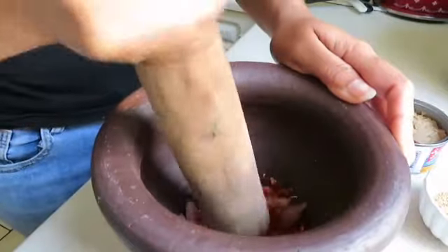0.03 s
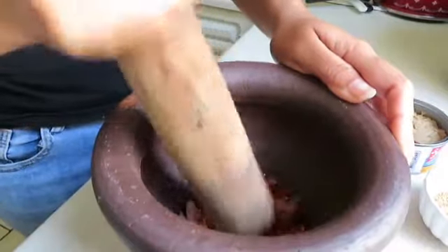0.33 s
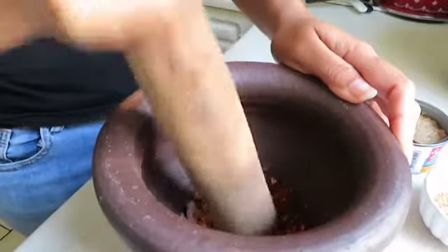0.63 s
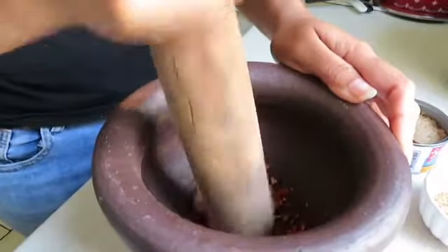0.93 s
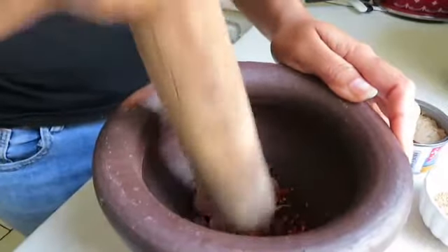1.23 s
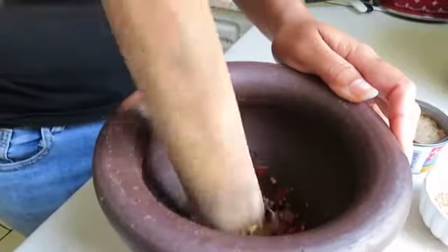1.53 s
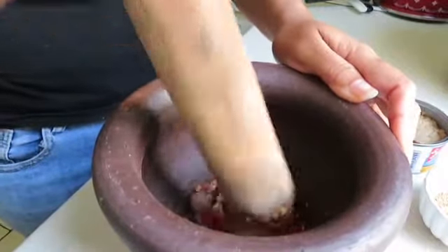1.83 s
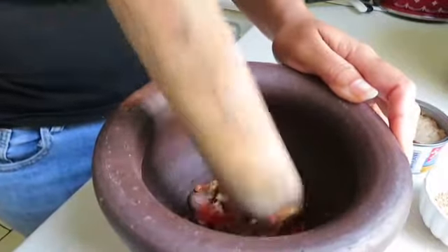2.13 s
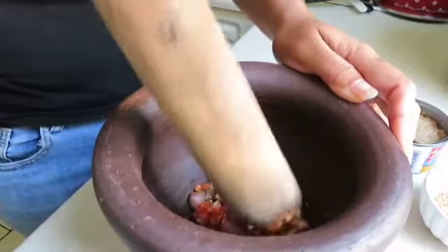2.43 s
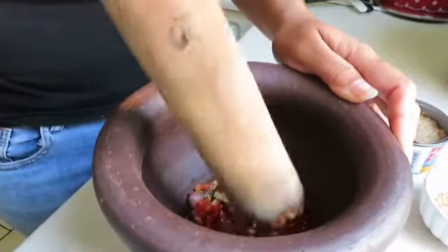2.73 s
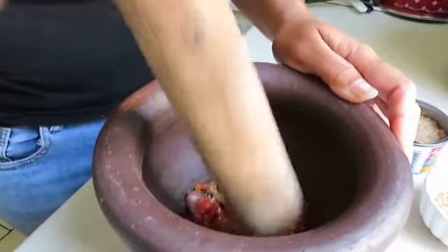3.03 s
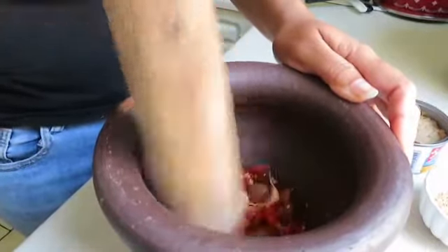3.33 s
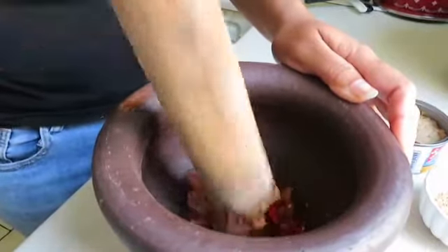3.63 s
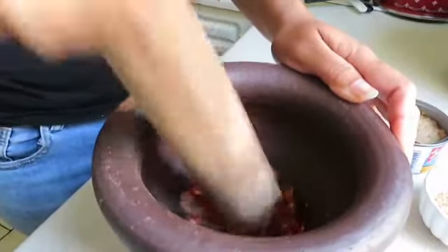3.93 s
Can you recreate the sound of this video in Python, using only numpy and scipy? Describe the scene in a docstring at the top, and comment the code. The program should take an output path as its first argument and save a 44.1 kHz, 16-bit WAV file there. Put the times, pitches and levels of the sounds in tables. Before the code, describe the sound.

Close, regular pounding of a wooden pestle in a clay mortar crushes wet spices in a quiet kitchen. Some strokes knock on the bowl, others thud and squelch, growing heavier with a brief scrape in the second half.

```python
"""A wooden pestle pounds moist spices in a clay mortar on a kitchen table, about 3.5 strokes a second.
Each impact crushes the paste and excites the table's low modes; those that reach the clay knock and
set the bowl in free vibration. Bubbles burst, bits crackle as the pestle shifts, and once it grinds
along the wall. A small room reverberates, and the hardest knocks overload the microphone."""
import sys
import numpy as np
from scipy import signal
from scipy.fft import rfft, irfft, next_fast_len
from scipy.io import wavfile

SR = 44100
rng = np.random.default_rng(int(sys.argv[2]) if len(sys.argv) > 2 else 0)


def output_pcm(signal):
    """Save a mono or channel-first signal as 16-bit PCM at the path in sys.argv[1].

    Samples are clipped to [-1, 1] before scaling.
    """
    pcm = np.clip(np.atleast_2d(signal).T, -1, 1) * 32767
    wavfile.write(sys.argv[1], SR, np.round(pcm).astype(np.int16))


N = 176400
TIME = np.arange(N) / SR
AGE = np.arange(SR // 2) / SR  # time since a sound began [s]
CRUNCH_LEAD_S, CRUNCH_FALL_S = .1, .0051

# pestle meets paste: (time [s], crunch [dB], swell [s], wet fizz [dB], table thump [dB])
STROKES = [(0.037, -33.5, .002, -50, -44), (0.341, -27, 0.0041, -42, -11.5), (.615, -43, 0.0075, -47, -35),
           (0.899, -79, 0.0031, -63, -10), (1.218, -19, 0.0061, -32.5, -4.5),
           (1.468, -17.5, 0.0019, -34.5, -7.5), (1.745, -33, 0.005, -53, -32.5),
           (2.063, -25.5, 0.0085, -41.5, -18), (2.363, -22, 0.0047, -38.5, -13),
           (2.646, -15.5, 0.0034, -29.5, -1), (2.9245, -9.5, 0.0023, -26.5, -2),
           (3.2095, -14.5, 0.0027, -29.5, -6), (3.480, -14, 0.0021, -49.5, -22),
           (3.818, -27, 0.0051, -49.5, -19.5)]
def pounding():
    """Inelastic impact: each stroke crushes the paste, squeezes it aside and shakes the table."""
    out = np.zeros((2, N))
    for s, db, swell_s, fizz_db, thump_db in STROKES:
        add(out, s - CRUNCH_LEAD_S, crunch(db, swell_s, fizz_db))
        add(out, s, squeeze(db - 23.5))
        add(out, s + .00067, thump(thump_db))
    return out


def crunch(db, swell_s, fizz_db):
    """Stress and release: pressure on the paste grows exponentially, then lets go quickly."""
    t = AGE - CRUNCH_LEAD_S
    pressure = np.exp(np.minimum(t, 0) / swell_s - np.maximum(t, 0) / CRUNCH_FALL_S)
    return in_room(pressure * paste(db, fizz_db), wet_db=-11.5)


# spectra of the bowl's cavity and of the wet fizz: (frequency [Hz], relative density [dB])
CAVITY = [(100, -14.5), (400, -3.5), (720, -3.5), (1050, -15), (1500, -2), (1850, -1), (2300, -1),
          (3200, -1.5), (4000, -14.5), (5500, -21), (14000, -31.5)]
FIZZ = [(1000, -33.5), (3500, -12.5), (6000, 2.5), (9500, 3), (12000, 1.5), (15000, -21), (16500, -26.5)]
def paste(db, fizz_db):
    """Source and filter: the cavity colours the ticks of bursting fibres, with wet fizz on top."""
    fibres = amp(db) * coloured(grains(len(AGE)), CAVITY)
    fizz = amp(fizz_db) * coloured(grains(len(AGE)), FIZZ)
    return fibres + fizz


def squeeze(db, fade_s=.06, clumps_per_s=170, spread_db=4):
    """Amplitude modulation: the paste oozes from under the pestle in uneven clumps."""
    sizes = rng.standard_normal(clumps_per_s)
    clumps = amp(spread_db * np.interp(AGE * clumps_per_s, np.arange(clumps_per_s), sizes))
    return in_room(clumps * np.exp(-AGE / fade_s) * paste(db, fizz_db=db - 16), wet_db=-12)


# modes of the table: (frequency [Hz], relative level [dB], T60 [s])
TABLE_MODES = [(62.6, -17.5, 0.28), (69, 4.5, 0.056), (118, -8, 0.099), (184.7, -12, 0.091),
               (251, -19.5, 0.041)]
def thump(db, attack_s=.0068):
    """Structure-borne sound: the blow passes into the table and excites its low modes."""
    modes = -ring(TABLE_MODES, cut_hz=300, scatter_db=3.85, detune=.012)
    attack = 1 - np.exp(-AGE / attack_s)
    return in_room(amp(db) * modes * attack, wet_db=-9.5)


# pestle reaches clay: (time [s], body [dB], contact cut-off [Hz], clack [dB], clack pitch [Hz],
# wall ring [dB], ring tilt [dB/octave], hollow [dB], hollow pitch [Hz])
KNOCKS = [(.0390, -14.5, 1400, 5, 1457, -26.5, -0.9, -36.5, 313),
          (0.6151, -17, 1030, -3.5, 1540, -24, -3.5, -36, 586),
          (0.8963, -20, 378, -30, 1243, -48, 1.5, -20, 317),
          (1.4667, -16.5, 924, 0, 1470, -32.5, -2.5, -32, 340),
          (1.7447, -16, 1764, 11.5, 1662, -22, -3, -17.5, 437),
          (2.9225, -24.5, 556, -10, 2210, -46, 5, -25, 322),
          (3.2071, -26, 700, 2.5, 2290, -52, -12, -29, 346),
          (3.4796, -15.5, 2293, 14.5, 1830, -19, -7.5, -10, 344),
          (3.83, -33, 490, -61, 1370, -74, -3, -63, 755),
          (3.86, -41.5, 490, -42.5, 1440, -80.5, -11, -32.5, 648)]
def knocks():
    """Impulse response: wood on clay excites the body, the hollow, the pestle's clack and the wall."""
    out = np.zeros((2, N))
    for s, body_db, contact_hz, clack_db, clack_hz, wall_db, tilt_db, hollow_db, hollow_hz in KNOCKS:
        body = amp(body_db) * mortar_body(contact_hz)
        hollow = damped_sine(hollow_hz, hollow_db, t60=.09)
        clack = damped_sine(clack_hz, clack_db, t60=.011)
        wall = amp(wall_db) * wall_ring(tilt_db)
        knock = in_room(body, wet_db=-6) + hollow + in_room(clack, wet_db=-15)
        add(out, s, knock + in_room(wall, wet_db=1.5))
    return out


# modes of mortar and pestle on the table: (frequency [Hz], relative level [dB], T60 [s])
BODY_MODES = [(129.1, -15, 0.47), (177, -13.5, 0.22), (236, -12.5, 0.17), (344.5, -1.5, 0.12),
              (436.3, -3.5, 0.099), (586.5, -7, 0.16), (680, 3, .04), (756, 5.5, 0.033), (957, -4.5, 0.073),
              (1167, -2, .07)]
# spectrum of the contact's crack: (frequency [Hz], relative density [dB])
CRACK = [(60, -5), (150, 29), (400, 15.5), (800, 11.5), (950, 8), (1500, -26), (2000, -2), (2600, 2.5),
         (4500, -36), (12000, -108), (16000, -50)]
def mortar_body(contact_hz):
    """Contact as a low-pass filter: a softer blow dulls both the crack and the body's modes."""
    noise = coloured(rng.standard_normal(len(AGE)), CRACK)
    crack = filtered(noise, lambda hz: lowpass(hz, 3 * contact_hz)) * decay(db=5, t60=.036)
    return ring(BODY_MODES, contact_hz, scatter_db=1, detune=.027) + crack


# modes of the clay wall: (frequency [Hz], relative level [dB], T60 [s])
WALL_MODES = [(1458, -2, 0.13), (1525, -4, .3), (1595, -9, .32), (1770, -8, 0.17), (1833, -2.5, 0.15),
              (2250, -19.5, 0.083), (3280, -18.5, 0.29), (3630, -9, 0.14), (3870, -10, .2),
              (5430, -11, 0.22), (5710, -12.5, 0.16), (7540, -10.5, 0.092), (8450, -15.5, 0.067),
              (9420, -13, 0.2), (10570, -18, 0.21), (12200, -9.5, 0.23), (12600, -16, .14),
              (14400, -18, .15)]
# spectrum of its crowded high modes: (frequency [Hz], relative density [dB])
SPARKLE = [(2000, -28.5), (3500, 2), (4700, -6), (6000, -5.5), (9000, -2.5), (12500, -3), (13500, -15.5),
           (16000, -30.5)]
def wall_ring(tilt_db, partials=8, split_hz=48):
    """Mode splitting: uneven clay gives beating partials; a glancing contact favours the high ones."""
    hz, db, t60 = np.transpose(WALL_MODES)[:, :, None]
    tilted_db = db + tilt_db * np.log2(hz / hz[0])
    beating = np.zeros(len(AGE))
    for _ in range(partials):
        shift, phase = rng.uniform(-1, 1, (2, len(WALL_MODES), 1))
        beating += damped_sine(hz + split_hz * shift, tilted_db, t60, np.pi * phase).sum(axis=0)
    sparkle = coloured(rng.standard_normal(len(AGE)), SPARKLE)
    sparkle = filtered(sparkle, lambda f: amp(tilt_db * np.log2(np.maximum(f / hz[0], 1))))
    return beating / np.sqrt(partials) + sparkle * decay(db=-11, t60=.17)


# loose bits of paste: (time [s], crunch [dB], swell [s], wet fizz [dB])
CRACKLES = [(0.4083, -43, 0.00034, -67), (.428, -45.5, .008, -72), (.632, -22.5, 0.0022, -32),
            (.945, -29, 0.013, -39.5), (.989, -41, 0.0018, -67), (1.036, -45.5, 0.0025, -56),
            (1.299, -41.5, 0.002, -56.5), (1.490, -29, 0.013, -38), (2.16, -42, .002, -60),
            (2.4579, -33.5, 0.0007, -49.5), (2.737, -38, .008, -59.5), (3.201, -29.5, .001, -40),
            (3.799, -37, 0.0023, -41)]
def crackling():
    """Acoustic emission: bits of paste snap or pull free as the pestle shifts."""
    out = np.zeros((2, N))
    for s, db, swell_s, fizz_db in CRACKLES:
        add(out, s - CRUNCH_LEAD_S, crunch(db, swell_s, fizz_db))
    return out


def bubbles(per_stroke=43, settle_s=.048, centre_hz=4800, decay_cycles=2.5):
    """Bubble resonance: as the paste settles, tiny bubbles burst, each at its own pitch."""
    pops, t = np.zeros(N), AGE[:SR // 200]
    for s, *_ in STROKES:
        for wait, octaves, size in rng.standard_normal((per_stroke, 3)):
            hz = np.clip(centre_hz * 2 ** octaves, 1200, 13000)
            db = -47 + 4 * np.clip(size, -2, 2) - 6 * abs(wait)  # later pops are fainter
            pop = amp(db) * np.exp(-t * hz / decay_cycles) * np.sin(2 * np.pi * hz * t)
            add(pops, s + abs(wait) * settle_s, pop)
    return in_room(pops, wet_db=-5)


# spectrum of dragged grit: (frequency [Hz], relative density [dB])
GRIT = [(100, 11), (550, -1.5), (900, -11.5), (1600, -11), (2050, 6), (2500, -9), (3500, -14), (4900, -30),
        (5450, -14), (6300, -28.5), (14000, -38.5)]
# envelope of the drag: (time [s], level [dB])
DRAG = [(2.65, -84.5), (2.69, -37.5), (2.77, -46.5), (2.83, -43), (2.91, -44), (3.03, -52.5), (3.10, -52.5)]
def grinding(judder_at_s=2.835, judder_for_s=.095, judder_hz=168, judder_db=-33.5):
    """Sliding friction: the pestle drags over grit on the wall and briefly judders."""
    drag = amp(np.interp(TIME, *np.transpose(DRAG), left=-120, right=-120))
    grit = drag * coloured(grains(N), GRIT)
    progress = np.clip((TIME - judder_at_s) / judder_for_s, 0, 1)
    arch = np.sqrt(np.abs(np.sin(np.pi * progress)))
    judder = amp(judder_db) * arch * np.sin(2 * np.pi * judder_hz * TIME)
    return in_room(grit, wet_db=-1.5) + judder


# reverberation time of the room: (frequency [Hz], T60 [s])
ROOM_T60 = [(80, .35), (300, 0.29), (800, 0.3), (2000, 0.26), (5000, 0.3), (13000, 0.17)]
# stereo width of the room's sound: (frequency [Hz], side gain [dB])
WIDTH = [(60, -41.5), (300, -20), (1000, -16.5), (3000, -11), (6000, -1.5), (12000, 2.5)]
def in_room(x, wet_db, build_up_s=.0021):
    """Reverberation: centred direct sound is followed by a diffuse tail that widens in the treble."""
    hz, t, noise = signal.stft(rng.standard_normal((2, len(AGE))), SR, nperseg=256)
    absorption = amp(-60 * t / along(ROOM_T60, hz)[:, None])
    tail = signal.istft(noise * absorption, SR, nperseg=256)[1][:, :len(AGE)]
    tail *= 1 - np.exp(-(AGE / build_up_s) ** 2)
    tail /= np.linalg.norm(tail[0])
    mid, side = amp(wet_db) * signal.fftconvolve(x[None], tail, axes=1)[:, :len(x)]
    return stereo(x + mid, side, WIDTH)


# spectrum of the room's background: (frequency [Hz], relative density [dB])
AMBIENCE = [(15, -37), (25, -11.5), (55, -0.5), (117, 8), (185, -3.5), (659, -13.5), (1040, -16),
            (1790, -16), (3340, -25.5), (4250, -25.5), (11900, -38.5), (16000, -60)]
def kitchen(db=-54.5):
    """Stationary noise: the quiet rumble and hiss of the room."""
    mid, side = coloured(rng.standard_normal((2, N)), AMBIENCE)
    return amp(db) * stereo(mid, side, WIDTH)


def ring(modes, cut_hz, scatter_db, detune):
    """Modal superposition: damped modes, varied at each blow, weaken above the contact's cut-off."""
    hz, db, t60 = np.transpose(modes)[:, :, None]
    gain, shift = rng.standard_normal((2, len(modes), 1))
    partials = damped_sine(hz * (1 + detune * shift), db + scatter_db * gain, t60)
    return np.sum(partials * lowpass(hz, cut_hz), axis=0)


def damped_sine(hz, db, t60, phase=0):
    """Free vibration of one damped mode."""
    return decay(db, t60) * np.sin(2 * np.pi * hz * AGE + phase)


def decay(db, t60):
    """Exponential decay: 60 dB down after t60 seconds."""
    return amp(db - 60 * AGE / t60)


def grains(size, per_s=4900):
    """Shot noise: dense random ticks of uneven strength."""
    return rng.standard_normal(size) * (rng.random(size) < per_s / SR)


def coloured(x, spectrum):
    """Spectral shaping, normalised to rms 1."""
    x = filtered(x, lambda hz: amp(along(spectrum, hz)))
    return x / np.sqrt(np.mean(x ** 2) + 1e-20)


def stereo(mid, side, width):
    """Sum and difference: mid and filtered side give left and right."""
    side = filtered(side, lambda hz: amp(along(width, hz)))
    return np.array([mid + side, mid - side])


def filtered(x, response):
    """Linear filtering: the spectrum times a frequency response."""
    n = x.shape[-1]
    padded = next_fast_len(n + 8192)
    return irfft(rfft(x, padded) * response(np.fft.rfftfreq(padded, 1 / SR)), padded)[..., :n]


def lowpass(hz, cut_hz):
    """First-order low-pass gain."""
    return 1 / np.sqrt(1 + (hz / cut_hz) ** 2)


def along(points, hz):
    """Interpolation on a logarithmic frequency axis."""
    f, value = np.transpose(points)
    return np.interp(np.log(hz + 1), np.log(f + 1), value)


def amp(db):
    """Amplitude ratio of a level in dB."""
    return 10 ** (np.asarray(db) / 20)


def add(track, s, sound):
    """Superposition of a sound on the track at s seconds."""
    i = round(s * SR)
    part = sound[..., max(-i, 0):max(N - i, 0)]
    track[..., max(i, 0):max(i, 0) + part.shape[-1]] += part


def scene():
    """Superposition of all sources at the microphone."""
    return knocks() + pounding() + crackling() + bubbles() + grinding() + kitchen()


def record(dry, low_cut_hz=40, top_hz=16400):
    """Band limiting and overload: the lowest bass is shed, peaks clip and the top treble is cut."""
    highpass = signal.butter(1, low_cut_hz, "highpass", fs=SR, output="sos")
    clipped = np.clip(signal.sosfilt(highpass, dry), -1, 1)
    return filtered(clipped, lambda hz: np.clip((top_hz - hz) / 2000, 0, 1) ** 1.5)


dry = scene()
out = record(dry)
output_pcm(out)
```